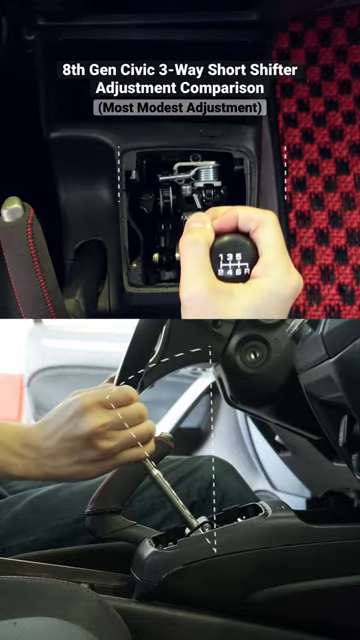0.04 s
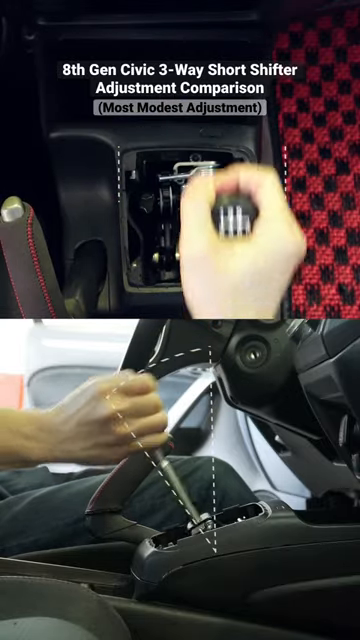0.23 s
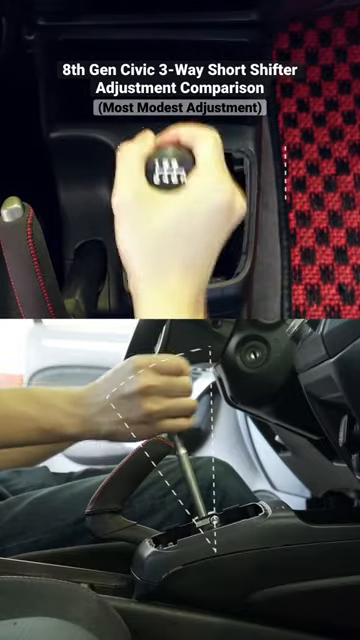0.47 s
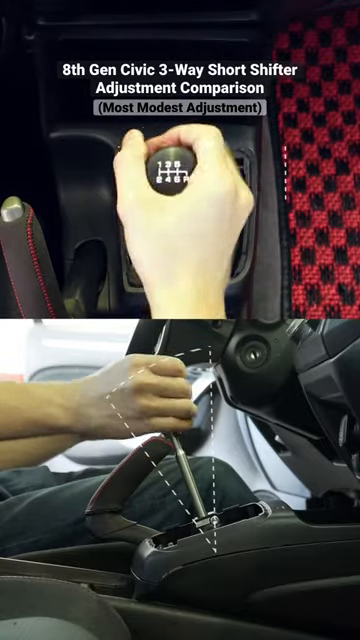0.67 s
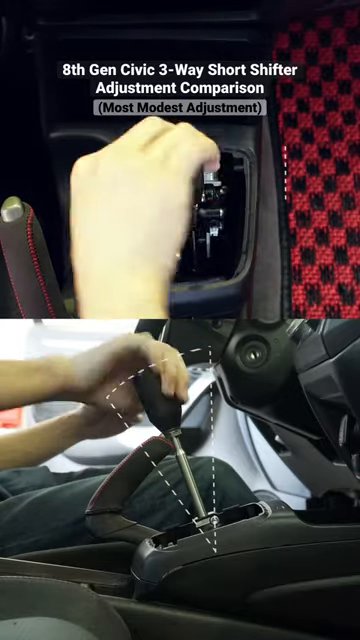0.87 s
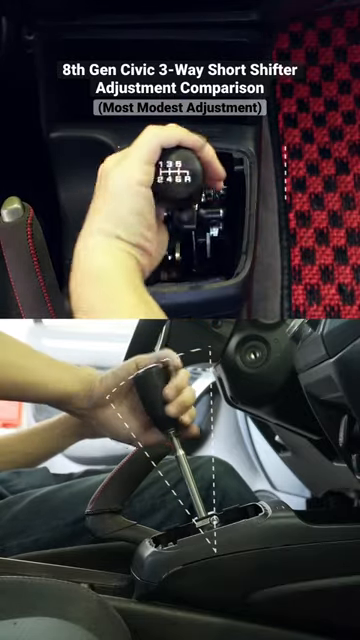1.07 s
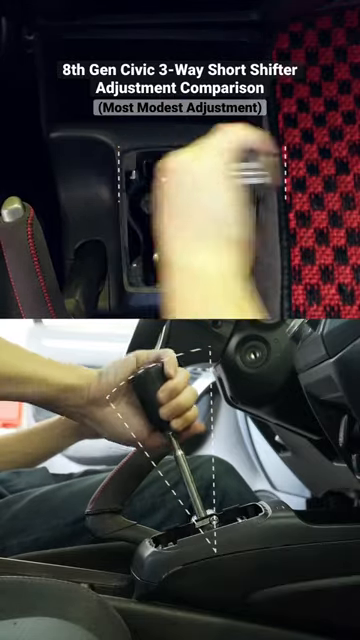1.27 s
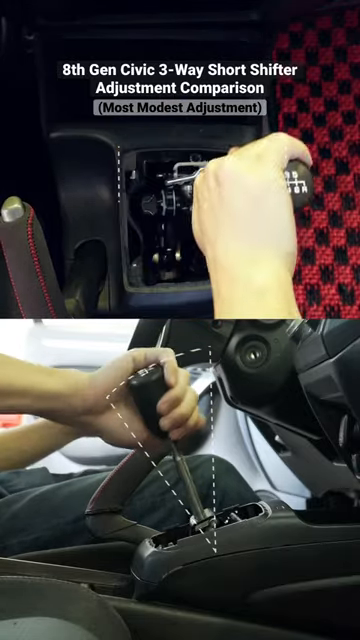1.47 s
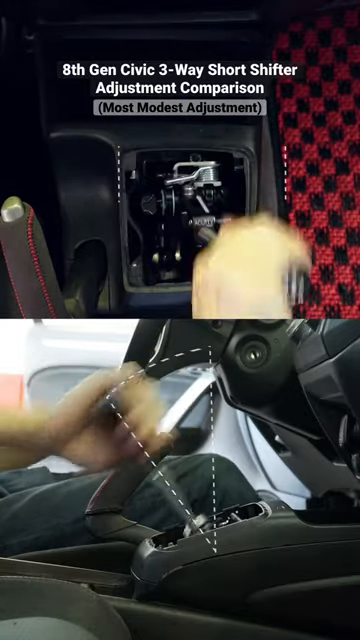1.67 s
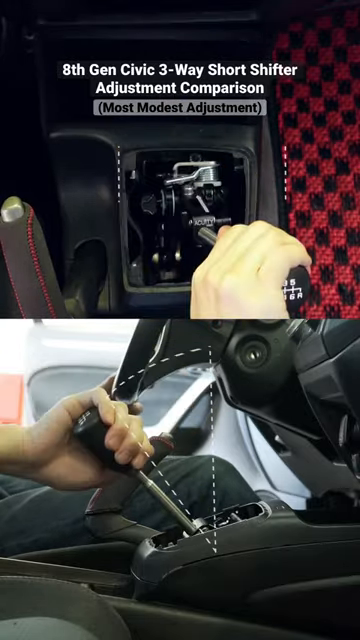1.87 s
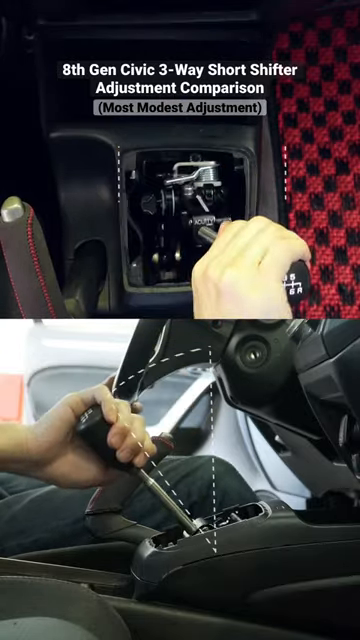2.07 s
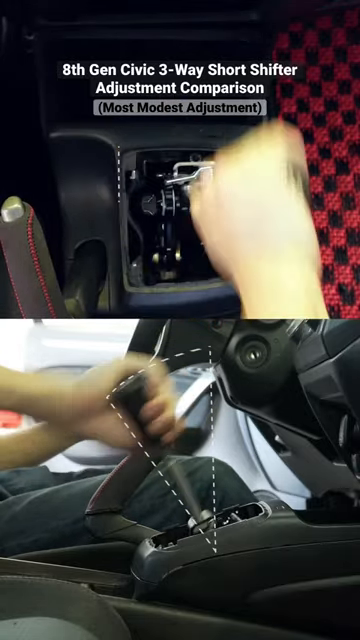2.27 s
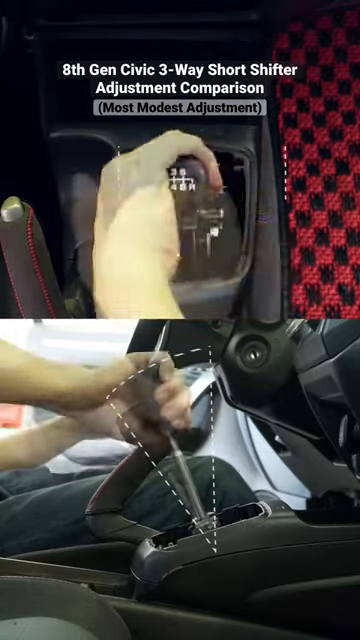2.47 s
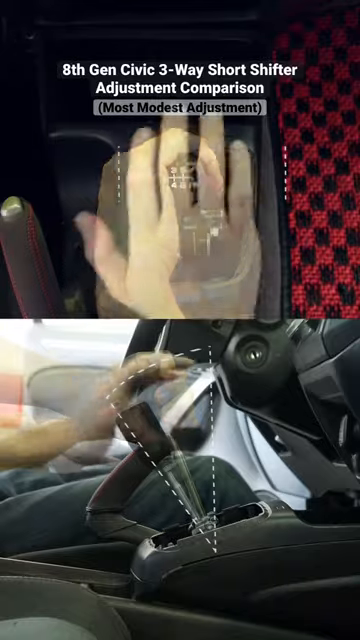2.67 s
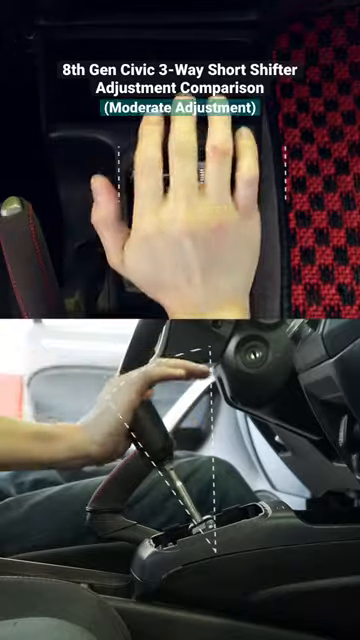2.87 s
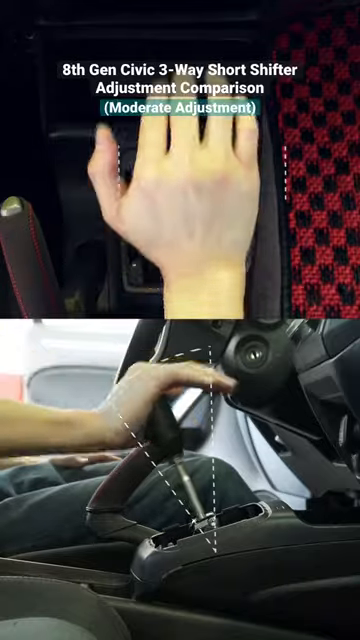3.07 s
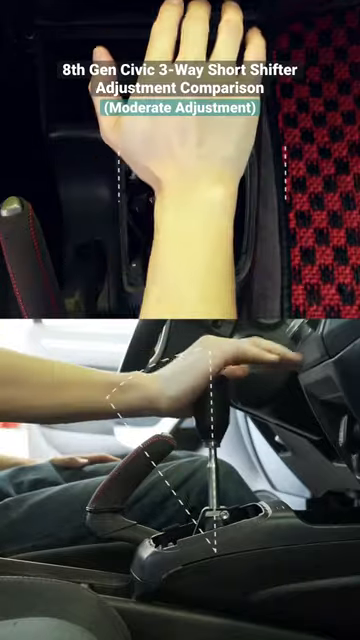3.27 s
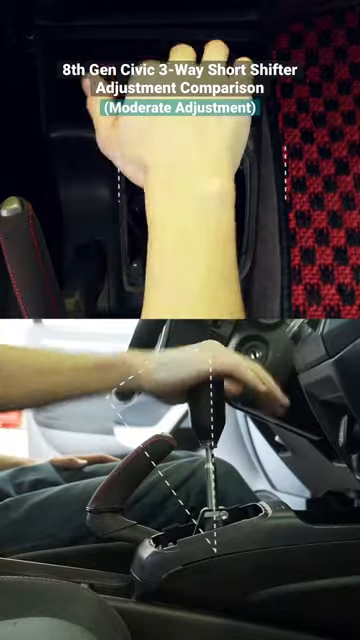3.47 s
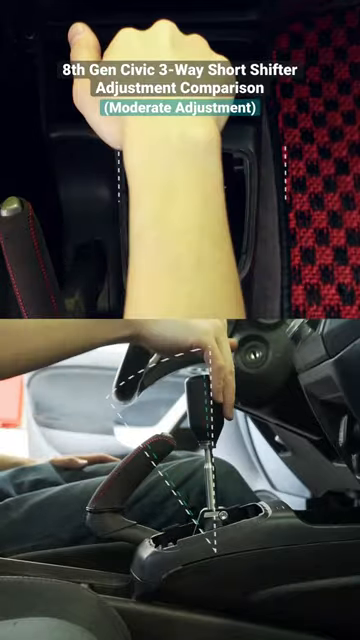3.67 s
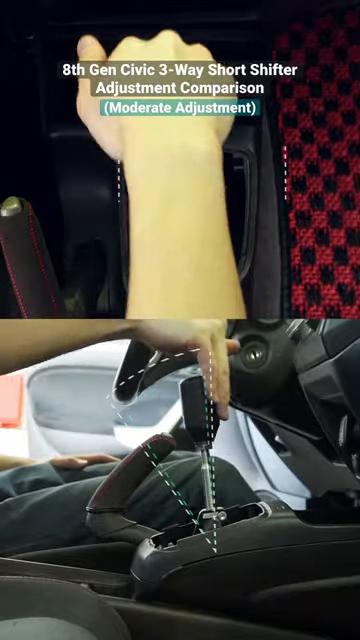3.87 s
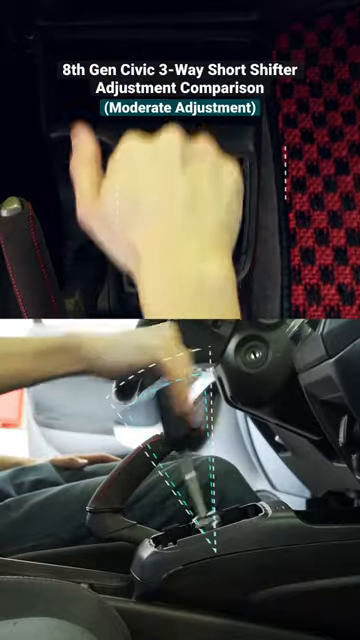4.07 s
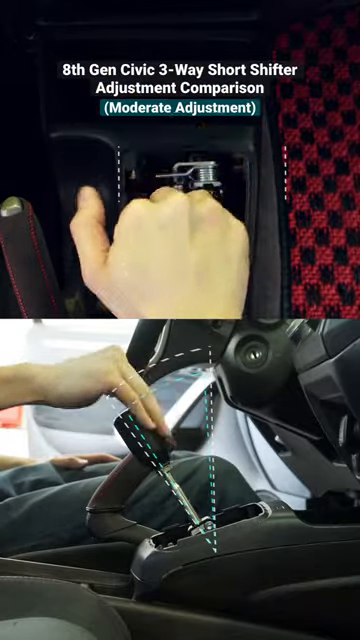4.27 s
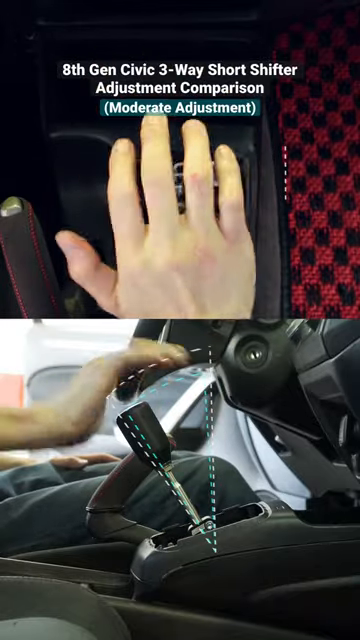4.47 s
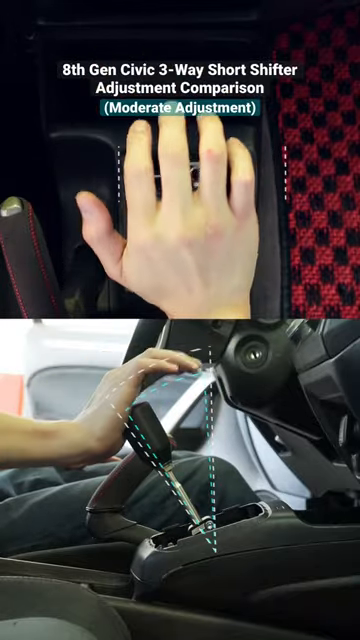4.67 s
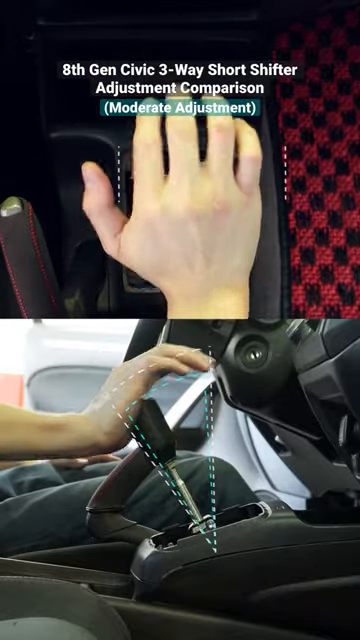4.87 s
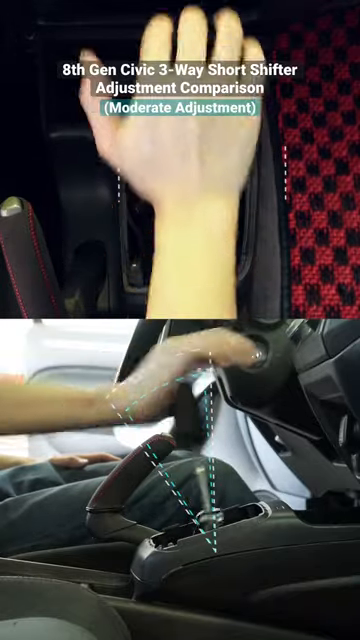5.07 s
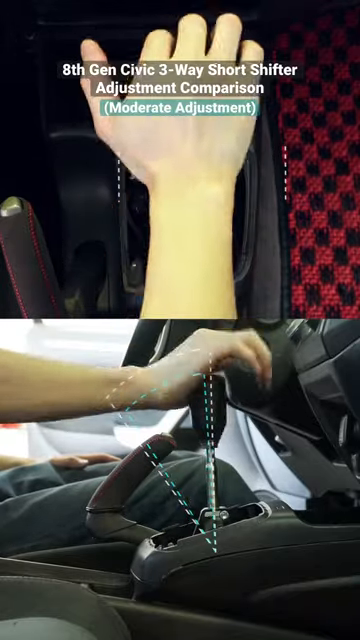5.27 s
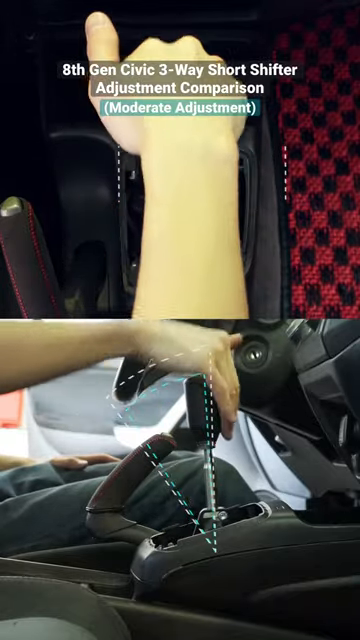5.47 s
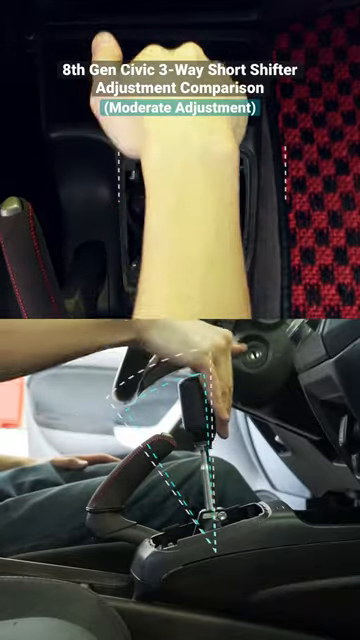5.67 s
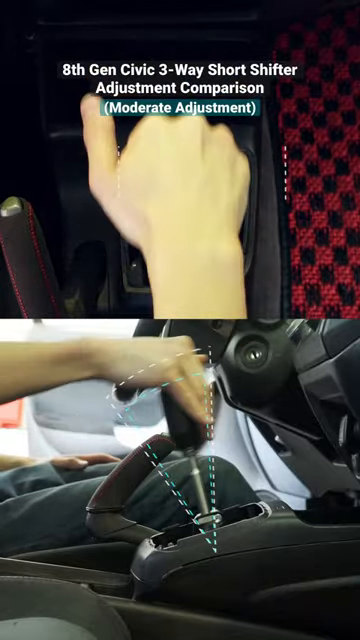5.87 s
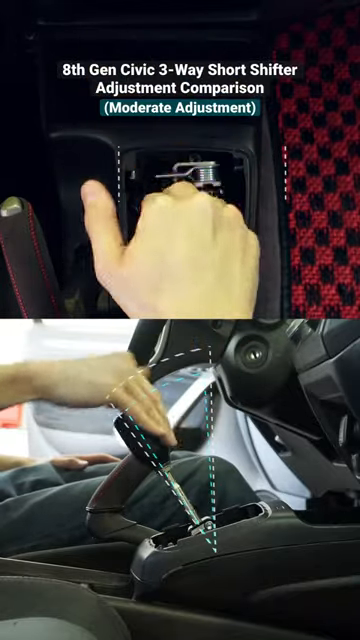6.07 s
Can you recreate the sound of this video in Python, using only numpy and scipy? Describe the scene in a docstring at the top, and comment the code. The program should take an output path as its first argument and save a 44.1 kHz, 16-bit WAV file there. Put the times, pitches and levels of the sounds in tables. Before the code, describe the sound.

A manual gear lever is shifted close to the microphone inside a car parked in a garage, engine off, over a faint low background. Distant tyre noise fades at the very start. Around 0.4 seconds the lever snaps into gear with a quick cluster of hollow knocks. Small clicks and a duller thud follow at 1.2 to 1.4. At 1.7 it goes into reverse with a sharp, bright steel crash, and it clatters back out from 2.2 to 2.4. Four firm throws follow at about 3.1, 4.1, 5.1 and 6 seconds. Each is a rapid release, engagement and bump against the stop, with a slight plastic rattle in the console and a steel clank from the gearbox farther off, ringing briefly around the garage. Forward and backward throws differ slightly in tone. Outside, soft traffic swells from about 3 seconds, peaks near 4.4 and fades.

```python
"""Distant tyres fade, then a bare manual gear lever knocks close to the microphone, inside a car parked
in a garage, engine off. Eight throws: the lever leaves its detent, meets the gear and bounces off its
stop, ringing the console. Farther off, the cables throw steel parts in the gearbox, whose clank rings
round the garage. Reverse crashes hardest, and forward and backward throws ring differently.
Outside, traffic swells and fades."""
import sys
import numpy as np
from scipy import signal
from scipy.fft import rfft, irfft
from scipy.io import wavfile
from scipy.ndimage import uniform_filter1d

SR = 44100
rng = np.random.default_rng(int(sys.argv[2]) if len(sys.argv) > 2 else 0)


def digitize_waveform(pressure):
    """Quantize a signal to 16-bit integers and store it at the path in sys.argv[1].

    Rows of a 2-D input are taken as channels; values are limited to [-1, 1].
    """
    field = np.atleast_2d(pressure).T
    bounded = np.clip(field, -1, 1)
    quanta = np.round(bounded * 32767).astype(np.int16)
    wavfile.write(sys.argv[1], SR, quanta)


N = 270333
TIME = np.arange(N) / SR


def undb(db):
    """Decibels to gain."""
    return 10 ** (np.asarray(db) / 20)


def bins(size):
    """Frequencies of a transform, kept above zero."""
    return np.maximum(np.arange(size // 2 + 1) * SR / size, 10)


FILTER_HZ = bins(size=2048)


def along(table, hz):
    """Read a (Hz, value) table on a log-frequency axis."""
    table_hz, value = np.transpose(table)
    return np.interp(np.log(hz), np.log(table_hz), value)


def unit(x):
    """Scale to rms 1."""
    return x / np.sqrt(np.mean(x ** 2))


def colour(x, gain_db):
    """Causal filter from a gain at FILTER_HZ; white noise keeps its power."""
    cepstrum = irfft(np.log(unit(undb(gain_db))))
    cepstrum[1:1024] *= 2  # fold to minimum phase
    cepstrum[1025:] = 0
    impulse = irfft(np.exp(rfft(cepstrum)))
    return signal.fftconvolve(x, impulse[None], axes=1)[:, :x.shape[1]]


def fade(t, t60):
    """Exponential decay, 60 dB down after t60."""
    return np.exp(-np.log(1000) * t / t60)


def add(out, s, x):
    """Mix x into out from time s."""
    i = max(int(s * SR), 0)
    out[:, i:i + x.shape[-1]] += x[..., :max(N - i, 0)]


def drift(rate_hz):
    """Smooth random drift of rms 1."""
    hold = int(SR / rate_hz)
    steps = np.repeat(rng.standard_normal(N // hold + 1), hold)[:N]
    return unit(uniform_filter1d(uniform_filter1d(steps, hold), hold))


def pan(right_db):
    """Channel gains with the right louder by right_db."""
    return undb(np.array([[-right_db], [right_db]]) / 2)


# Likeness of left and right at the microphone: (frequency [Hz], correlation [0-1])
MIC_LIKENESS = [(150, .9999), (280, 0.92), (520, 0.82), (1000, 0.64), (2200, 0.67), (4500, 0.59),
                (9000, 0.42)]
def stereo_noise(size):
    """White noise, alike left and right in the bass and less so in the treble."""
    mid, side = rfft(rng.standard_normal((2, size)))
    alike = along(MIC_LIKENESS, bins(size))
    spread = np.outer([1, -1], side * np.sqrt((1 - alike) / 2))
    return irfft(mid * np.sqrt((1 + alike) / 2) + spread, size)


# Room tone around the parked car: (frequency [Hz], relative level [dB])
ROOM_SPECTRUM = [(15, -40), (25, -11), (59, -2.5), (82, -4.5), (99, -21), (152, -5.5), (368, -17),
                 (469, -10), (509, -17), (1270, -16), (1380, -15), (2230, -19), (2420, -26), (5580, -34),
                 (15500, -41)]
def room_tone(level_db=-62, waver_db=1.5):
    """A quiet, low background that wavers slightly."""
    gain = undb(level_db + waver_db * drift(5.61))
    return gain * colour(stereo_noise(N), along(ROOM_SPECTRUM, FILTER_HZ))


# Tyres on the road outside: (frequency [Hz], relative level [dB])
TYRE_SPECTRUM = [(60, -25.5), (200, -6), (300, -11.5), (480, -9.5), (570, -13), (750, -8.5), (900, -2),
                 (1030, 2), (1130, 1), (1250, -1.5), (1420, -6), (2200, -9.5), (4000, -18.5), (10000, -50)]
# Cars passing at a distance: (time when nearest [s], level [dB], swell width [s])
PASSING_CARS = [(-.05, -49.5, .14), (3.88, -47.5, .69), (4.43, -42.8, .18)]
def traffic(far_db=-66, near_tilt=-1, far_tilt=-4, waver_db=1.5):
    """Tyre roar swells and brightens as each car passes; distance dulls it (tilts in dB/octave)."""
    far_power = undb(far_db) ** 2
    power = far_power + sum(undb(db) ** 2 * np.exp(-.5 * ((TIME - s) / swell_s) ** 2)
                            for s, db, swell_s in PASSING_CARS)
    level_db = 10 * np.log10(power)
    tilt = near_tilt + (far_tilt - near_tilt) * np.sqrt(far_power / power)
    roar = rfft(colour(stereo_noise(N), along(TYRE_SPECTRUM, FILTER_HZ)))
    octaves, out = np.arange(-2, 4), np.zeros((2, N))
    for octave, band in zip(octaves, np.eye(len(octaves))):
        share = np.interp(np.log2(bins(N) / 1000), octaves, band)
        out += irfft(roar * share, N) * undb(level_db + tilt * octave + waver_db * drift(8.7))
    return out


# The garage around the car: (frequency [Hz], t60 [s])
GARAGE_DECAY = [(100, 0.34), (300, 0.64), (800, 0.54), (2000, 0.62), (4500, 0.57), (8000, 0.45),
                (14000, 0.26)]
def garage_ring():
    """Dense ring of steel and walls; the top treble dies first."""
    t, hz = np.arange(SR) / SR, bins(SR)
    band_hz, band_t60 = np.transpose(GARAGE_DECAY)
    spectrum, ring = rfft(stereo_noise(SR)), np.zeros((2, SR))
    for t60, band in zip(band_t60, np.eye(len(band_hz))):
        share = np.interp(np.log(hz), np.log(band_hz), band)
        ring += irfft(spectrum * share, SR) * fade(t, t60)
    return ring


# Small dry clicks near the microphone: (time [s], level [dB], tilt [dB/octave])
LINKAGE_CLICKS = [(.706, -52, -1), (.742, -54, -3), (1.176, -40, 3.5), (1.180, -38.5, -9), (1.290, -46, -4),
                  (1.314, -46, -3), (1.319, -41, 1), (1.691, -26.5, 6), (5.773, -54, -3)]
# Their tone in the cabin: (frequency [Hz], relative level [dB])
CLICK_SPECTRUM = [(300, -10), (1000, -21), (1750, 13.5), (2600, -3), (6000, 0.5), (8300, -4.5),
                  (11000, -16.5), (15500, -20.5)]
def linkage_clicks(click_t60=.03, tail_db=-25, tail_t60=0.24):
    """The knob and linkage click brightly, with a faint cabin tail."""
    out, t = np.zeros((2, N)), np.arange(SR // 4) / SR
    for s, db, tilt in LINKAGE_CLICKS:
        click = stereo_noise(len(t)) * (fade(t, click_t60) + undb(tail_db) * fade(t, tail_t60))
        tilt_db = tilt * np.log2(np.maximum(FILTER_HZ, 1000) / 3000)
        add(out, s, undb(db) * colour(click, along(CLICK_SPECTRUM, FILTER_HZ) + tilt_db))
    return out


# Throws of the lever, each lasting until the next: (start [s], direction [0 back to 1 forward])
LEVER_THROWS = [(0, 0.93), (1.1, 0), (1.55, 0.5), (2.1, 0.35), (2.8, 1), (3.9, 0.15), (4.8, 1), (5.7, 0)]
def forward_share(s):
    """How much the throw under way at time s loads the forward stops."""
    start, share = np.transpose(LEVER_THROWS)
    return share[max(np.searchsorted(start, s) - 1, 0)]


# Gearbox case and selector arms: (frequency [Hz], width [Hz], forward lift [dB], backward lift [dB])
STEEL_MODES = [(1255, 90, -0.5, 6), (1700, 66, 2, 5.5), (2162, 96, 3, 1), (2567, 42, 4.5, 3.5),
               (2960, 70, 1.5, 5.5), (3100, 24, 1, -4.5), (3290, 63, 3.5, -0.5), (3430, 44, 2.5, -1),
               (3910, 92, 2.5, 1.5), (4450, 150, 2.5, 5.5), (4743, 100, 5, 3.5), (6040, 60, -3, -5),
               (7100, 64, 1, 1), (7580, 300, 2, 3.5), (9040, 350, 3.5, 4), (10500, 200, 5, 3)]
def steel_resonances(s, scatter=0.45):
    """Lift in dB; the direction of the throw and the spot of contact set each mode's share."""
    hz, width, forward_db, back_db = np.array(STEEL_MODES).T[:, :, None]
    lift_db = back_db + forward_share(s) * (forward_db - back_db)
    drive = 1 + scatter * rng.standard_normal((len(hz), 1))
    return np.sum(lift_db * drive / (1 + (2 * (FILTER_HZ - hz) / width) ** 2), axis=0)


# Each contact below knocks close by in the console and clanks farther off in the gearbox.
# The cables tighten, then the lever snaps out of its detent:
# (time [s], tension beforehand [s], knock [dB], corner [Hz], clank [dB])
DETENT_RELEASES = [(.342, .022, -27, 300, -32.3), (1.665, .008, -26, 235, -25.5),
                   (2.196, .011, -36, 380, -36.5), (3.111, .009, -24.5, 300, -25),
                   (4.068, .015, -26, 390, -26.3), (5.039, .009, -25.5, 360, -25.2),
                   (5.901, .019, -23, 490, -28)]
# The gear goes in: (time [s], knock [dB], corner [Hz], clank [dB], tilt [dB/octave], ring [Hz], lift [dB])
GEAR_ENTRIES = [(.435, -19.7, 270, -35.8, -1.5, 1320, 11), (1.313, -15.8, 222, -40, -6.3, 8200, 12),
                (1.684, -20.3, 220, -21.5, 1, 1620, 9.5), (3.163, -18.5, 265, -25.7, -.8, 5000, 3),
                (4.139, -23.5, 520, -26.3, -.7, 1260, 11), (5.085, -19.5, 305, -22.7, -1.4, 4670, 3),
                (5.994, -24.5, 520, -25.7, -1.5, 4450, 2)]
# The lever meets its stop: (time [s], knock [dB], corner [Hz], lightness [dB/octave], clank [dB])
STOP_HITS = [(.457, -23.5, 350, -2.5, -39.5), (1.351, -21.5, 280, 1, -54), (1.705, -28.5, 120, -9, -29),
             (3.188, -16.3, 164, 12, -23.7), (4.154, -13, 300, 4, -22.5), (5.111, -19, 158, 10, -27.5),
             (6.016, -16, 415, -1.5, -27.3)]
def shift_clanks():
    """Steel contacts: (time [s], level [dB], tilt [dB/octave], ring [Hz], lift [dB], rise [s])."""
    rows = []
    for s, tension_s, *_, db in DETENT_RELEASES:
        rows.append((s - tension_s, db - 7.5, -3, 4400, 2, .015))  # slack taken up
        rows.append((s, db, -.7, 4650, 2, .02))  # detent lets go
    rows += [(s, db, *tone, .009) for s, _, _, db, *tone in GEAR_ENTRIES]
    return rows + [(s, db, -1.8, 2680, 4, .013) for s, *_, db in STOP_HITS]


# The lever bumps the gate between gears, close by: (time [s], level [dB], corner [Hz])
GATE_BUMPS = [(.195, -40, 380), (.398, -26, 340), (.668, -42, 190), (1.184, -39, 650), (1.215, -33.5, 200),
              (1.284, -30.5, 190), (1.299, -24, 112), (1.489, -45, 200), (1.608, -42, 220),
              (2.265, -22, 300), (2.305, -28, 210), (2.341, -27, 190), (2.403, -22.5, 225),
              (2.892, -44, 230), (3.826, -45, 260), (4.842, -42, 210)]
def shift_knocks(rebound_s=.018, rebound_db=-7.5, rebound_hz=158):
    """Lever contacts: (time [s], level [dB], corner [Hz], lightness [dB/octave], rattle [dB])."""
    rows = [(s, db, corner_hz, 2.5, -17) for s, _, db, corner_hz, _ in DETENT_RELEASES]
    rows += [(*bump, -1.5, -18.5) for bump in GATE_BUMPS]
    rows += [(s, db, corner_hz, 6.5, -14) for s, db, corner_hz, *_ in GEAR_ENTRIES]
    for s, db, corner_hz, lightness, _ in STOP_HITS:
        rows.append((s, db, corner_hz, lightness, -11.5))
        rows.append((s + rebound_s, db + rebound_db, rebound_hz, 4.5, -19))  # one bounce off the rubber
    return rows


# The gearbox as heard from the cabin: (frequency [Hz], relative level [dB])
CLANK_SPECTRUM = [(60, -16), (170, -10.5), (500, -8), (720, -11), (1080, -5.5), (1600, -5), (2200, -2),
                  (4400, -2), (6200, -6.5), (7300, -13.5), (8400, -14.5), (10000, -18.5), (12500, -28.5),
                  (15500, -48.5)]
# Reverse crashing in and out of mesh:
# (time [s], level [dB], tilt [dB/octave], ring [Hz], lift [dB], rise [s])
REVERSE_CRASHES = [(1.685, -18.3, 7, 3630, 12.5, .0065), (1.695, -17.3, 5, 6200, 10, .045),
                   (1.742, -25, 1, 1130, 10.5, .0066), (2.255, -25.7, -1.5, 3350, -2, .04),
                   (2.297, -23.8, -1, 2120, 15, .015), (2.303, -22, -.5, 3430, 10.5, .0037),
                   (2.307, -23, 0, 6300, 7, .0096), (2.380, -31, -2, 1940, 9, .0063)]
def gearbox(shared=0.69, ring_octaves=0.24, early_db=-3, early_t60=0.017):
    """Every clank shares part of one ring; the place of contact gives it the rest and its own colour."""
    out, t = np.zeros((2, N)), np.arange(SR) / SR
    common_ring = garage_ring()
    early = 1 + undb(early_db) * fade(t, early_t60)  # floor and bodywork answer first
    for s, db, tilt, ring_hz, lift_db, rise_s in [*REVERSE_CRASHES, *shift_clanks()]:
        ring = np.sqrt(shared) * common_ring + np.sqrt(1 - shared) * garage_ring()
        rise = 1 - np.exp(-t / rise_s)  # sliding contacts and reflections build up gradually
        peak_db = lift_db * np.exp(-.5 * (np.log2(FILTER_HZ / ring_hz) / ring_octaves) ** 2)
        tilt_db = tilt * np.log2(np.maximum(FILTER_HZ, 700) / 3000)
        tone_db = along(CLANK_SPECTRUM, FILTER_HZ) + steel_resonances(s) + peak_db + tilt_db
        add(out, s, undb(db) * colour(ring * early * rise, tone_db))
    return out


def loose_play(per_s=8, grip_until_s=2.6, grip_db=-47.5, open_hand_db=-58, spread_db=3):
    """Faint random knocks, laid out as in shift_knocks; a fist stirs the lever more than an open hand."""
    jitter, strength = rng.random((int(per_s * N / SR), 2)).T
    times = (np.arange(len(jitter)) + jitter) / per_s
    levels = np.where(times < grip_until_s, grip_db, open_hand_db) + spread_db * (2 * strength - 1)
    return [(s, db, 220, -3, -14) for s, db in zip(times, levels)]


# Console and lever housing, right by the microphone:
# (frequency [Hz], forward level [dB], backward level [dB], t60 [s])
CONSOLE_MODES = [(75, -12, -5, 0.19), (100.2, -14, -7.5, 0.25), (152, -1.5, -1, 0.25), (168, 0, -0.5, 0.12),
                 (198.4, -4.5, -5.5, 0.16), (225.5, 0, -1.5, 0.16), (281, -6, -6, 0.068),
                 (298.6, -7, -4, 0.17), (365.3, -9.5, -2, 0.08), (447.6, -2.5, 0, 0.13),
                 (503, -4.5, 1, .08), (560.3, -1.5, -10.5, 0.18)]
def lever(rattle_t60=0.13, push_s=0.0033, scatter_db=2.2, detune=0.0084,
          cabin_db=-25, cabin_t60=0.66, stop_loss=0.56):
    """Knocks ring the console and rattle loose plastic; soft ones reach only low modes, light miss them."""
    out, t = np.zeros((2, N)), np.arange(SR // 2) / SR
    hz, forward_db, back_db, t60 = np.array(CONSOLE_MODES).T[:, :, None]
    attack = 1 - np.exp(-t / push_s)
    for s, db, corner_hz, lightness, rattle_db in shift_knocks() + loose_play():
        strength, mistune = rng.standard_normal((2, len(hz), 1))
        phase = rng.random((len(hz), 1))
        mode_db = back_db + forward_share(s) * (forward_db - back_db)
        ratio = hz / corner_hz  # each contact's hardness sets a corner frequency; modes swell near it and fall away above
        gain = undb(mode_db + lightness * np.log2(ratio) + scatter_db * strength)
        gain /= np.hypot(1 - ratio ** 2, stop_loss * ratio)
        modes = gain * np.sin(2 * np.pi * (hz * (1 + detune * mistune) * t + phase)) * fade(t, t60)
        thud = modes.sum(axis=0) / np.sqrt(np.sum(gain ** 2))
        rattle = plastic_rattle(t, rattle_t60)
        # the cabin keeps a weak low boom after the blow
        boom_db = -10 * np.log10((1 + (FILTER_HZ / corner_hz) ** 4) * (1 + (75 / FILTER_HZ) ** 6))
        boom = colour(stereo_noise(len(t)) * fade(t, cabin_t60), boom_db)
        add(out, s, undb(db) * attack * (thud + undb(rattle_db) * rattle + undb(cabin_db) * boom))
    return out


# Loose plastic in that console: (frequency [Hz], relative level [dB])
PLASTIC_SPECTRUM = [(30, -12), (80, -12.5), (300, 0), (550, 0.5), (750, -2), (1300, 1.5), (2200, -8.5),
                    (4500, -13), (8000, -27), (11000, -28.5), (15000, -54)]
def plastic_rattle(t, t60):
    """The noisy part of the lever's knock."""
    return colour(stereo_noise(len(t)) * fade(t, t60), along(PLASTIC_SPECTRUM, FILTER_HZ))


def scene():
    """From the cabin: lever close and central, gearbox and traffic diffuse and slightly to the right."""
    car = lever() + linkage_clicks() + pan(right_db=0.5) * gearbox()
    return car + pan(right_db=1.5) * traffic() + room_tone()


def record(dry, low_cut_hz=39, top_hz=15400):
    """The recorder drops the deepest rumble and cuts the top."""
    thinned = signal.sosfilt(signal.butter(2, low_cut_hz, "high", fs=SR, output="sos"), dry)
    return signal.sosfilt(signal.ellip(8, .2, 70, top_hz, fs=SR, output="sos"), thinned)


dry = scene()
out = record(dry)
digitize_waveform(out)
```